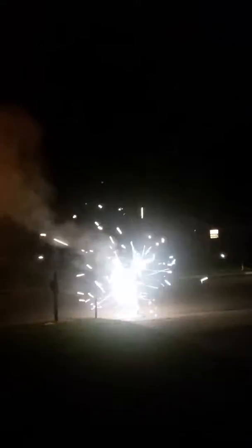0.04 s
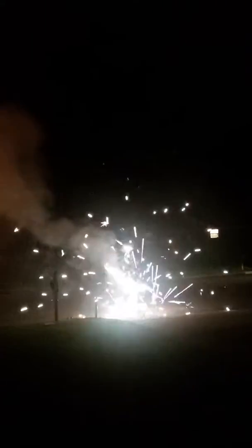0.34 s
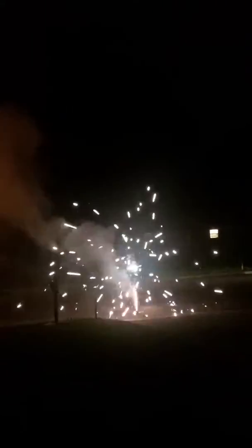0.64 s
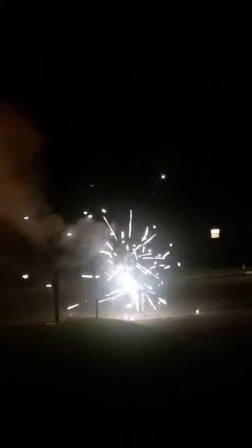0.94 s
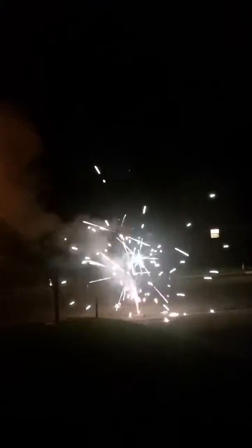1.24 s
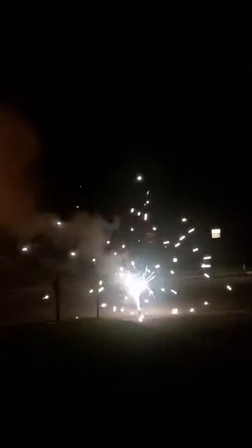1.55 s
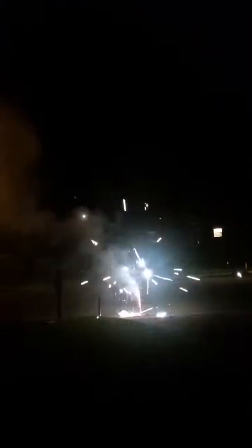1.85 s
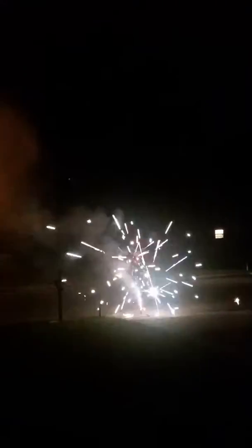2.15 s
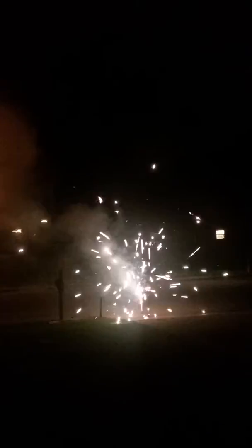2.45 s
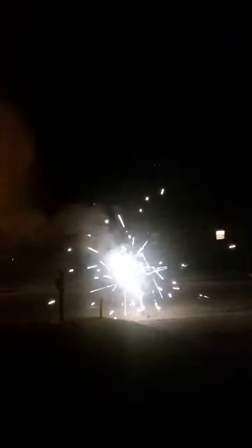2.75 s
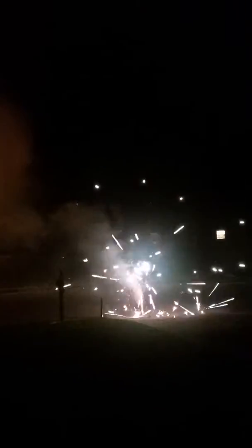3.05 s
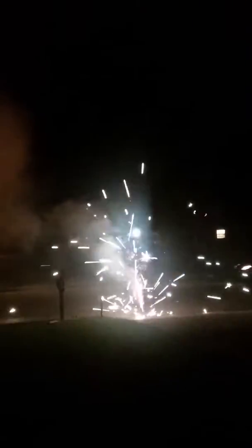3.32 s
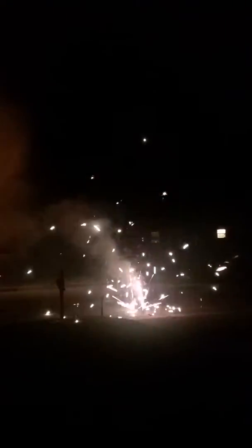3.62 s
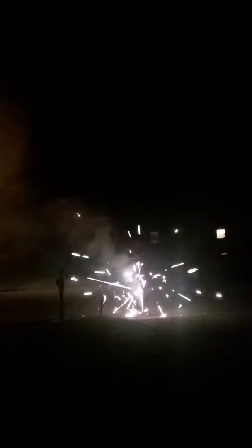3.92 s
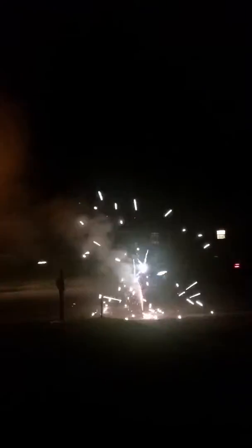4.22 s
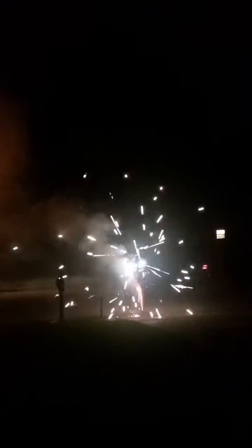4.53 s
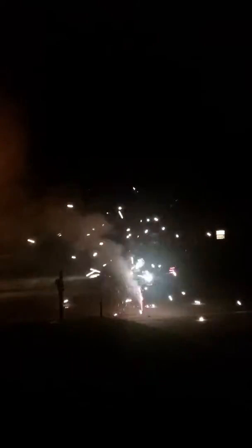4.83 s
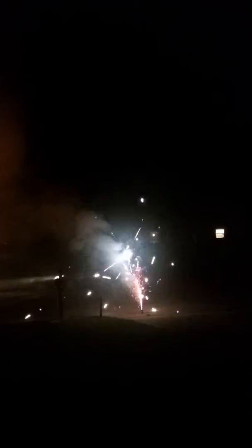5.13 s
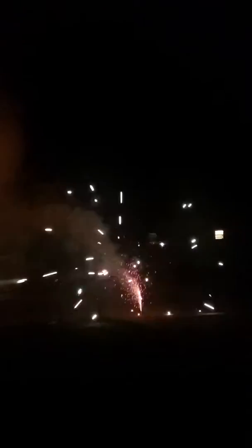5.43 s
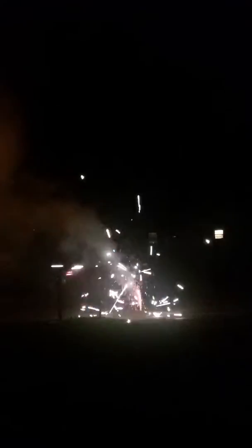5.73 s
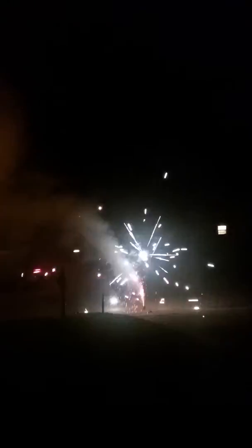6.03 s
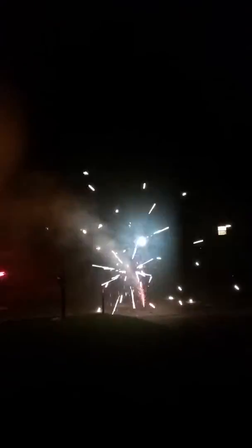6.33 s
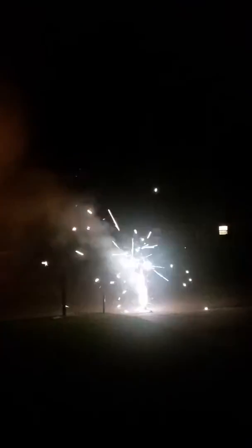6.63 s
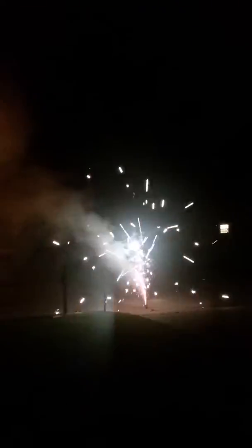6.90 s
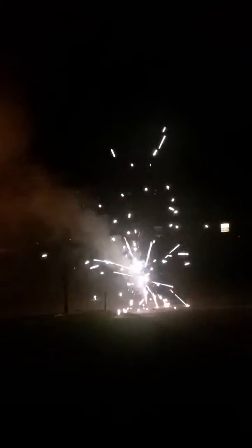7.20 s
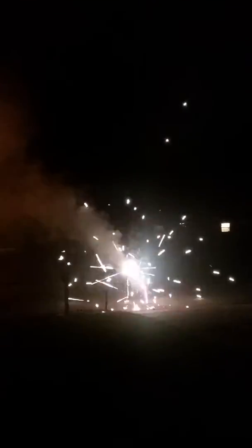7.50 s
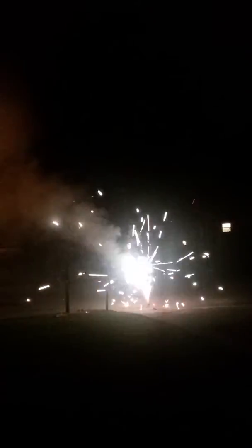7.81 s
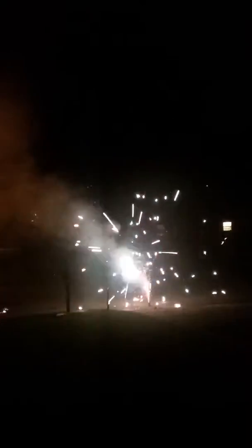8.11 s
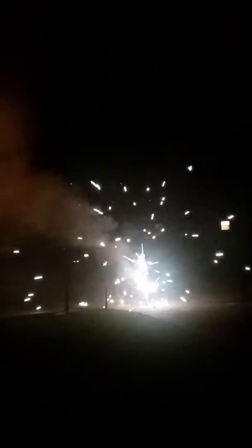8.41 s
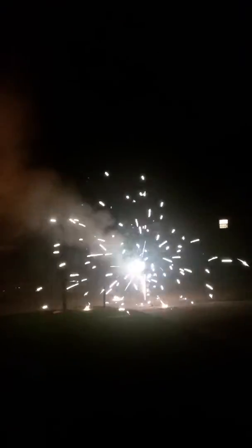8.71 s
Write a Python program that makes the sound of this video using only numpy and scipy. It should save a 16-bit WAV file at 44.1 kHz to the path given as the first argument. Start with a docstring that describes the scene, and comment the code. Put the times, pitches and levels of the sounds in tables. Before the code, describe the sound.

A fountain firework is already crackling at the start, several metres away in an open yard, and keeps going for about nine seconds. Sharp, bright pops come at roughly twenty or more a second, irregular in timing and strength, some doubling up or bunching into quick volleys. Each has a short echo with a slightly hollow ring from nearby walls. Beneath them are tiny spark snaps and a faint steady hiss with a low rumble. The crackle has very brief gaps around 1.8, 3.8 and 5.2 seconds. Faint low thuds come from farther off at about 2.1, 4.3 and 5.8 seconds. Stronger cracks stand out near 1.3, 3.2 and 4.8 seconds. From about 6.8 seconds the popping grows a little denser and louder, with a hard crack near 8.7 seconds.

```python
"""On a lawn at night, a fountain firework crackles some metres away.
Each bursting star sends out a tiny blast wave, heard as a crack. The ground and nearby surfaces reflect
it, walls add a low hollow ring, and the yard scatters it into a short dull tail. Underneath, the jet
hisses faintly, small sparks snap, and a few low thuds come from farther off."""
import sys
import numpy as np
from scipy import signal
from scipy.fft import rfft, irfft, next_fast_len
from scipy.io import wavfile
from scipy.ndimage import uniform_filter1d, minimum_filter1d

SR = 44100
rng = np.random.default_rng(int(sys.argv[2]) if len(sys.argv) > 2 else 0)


def log_audio(samples):
    """Write samples as a 16-bit WAV file to the path given in sys.argv[1]."""
    # one column per channel
    frames = np.atleast_2d(samples).T
    # limit to full scale, then quantise
    limited = np.clip(frames, -1, 1)
    pcm = np.round(limited * 32767).astype(np.int16)
    wavfile.write(sys.argv[1], SR, pcm)


N = 386296
FFT_SIZE = next_fast_len(N + SR, True)   # room for the tails
BIN_HZ = np.maximum(np.arange(FFT_SIZE // 2 + 1) * SR / FFT_SIZE, 1)

# Spectrum of the burning jet and the night air. Each row: frequency in Hz, relative level in dB.
JET_SPECTRUM = [(25, -16), (70, -3), (130, -5.5), (400, -6.5), (1500, 5.5), (3500, -6.5), (7000, -26),
                (15000, -37)]
# Distant thuds. Each row: start in seconds, level in dB.
FAR_THUDS = [(2.07, -41.5), (4.26, -45.5), (5.79, -44.5)]
# Spectrum of the yard's scatter. Each row: frequency in Hz, relative level in dB.
YARD_SPECTRUM = [(60, -6), (150, -13.5), (280, -5), (420, -8.5), (700, -1.5), (1200, 0), (4000, 2.5),
                 (8000, 0.66), (15000, 5.5)]
# Reverberation of the yard. Each row: frequency in Hz, time to fall 60 dB in seconds.
YARD_DECAY = [(100, 1), (500, 0.32), (2000, 0.64), (6000, 0.84), (15000, 0.69)]
# Modes between the walls. Each row: frequency in Hz, level in dB, time to fall 60 dB in seconds.
WALL_RESONANCES = [(120.7, -57, 0.66), (200, -50.5, 0.16), (287, -45.5, 0.12), (406.7, -47.5, 0.17),
                   (502.2, -47, 0.27), (601.5, -51.5, 0.31), (695, -49, 0.24), (801, -54.5, 0.33),
                   (942, -62, 0.087), (1105, -49, 0.13), (1337, -57.5, 0.24)]
# Reflections from nearby surfaces. Each row: delay in ms, left gain in dB, right gain in dB.
NEAR_REFLECTIONS = [(1.52, -16, -43), (1.96, -29, -19.5), (3.6, -7.5, -44), (3.9, -14.5, -8),
                    (4.7, -15.5, -11.5), (11.4, -24, -12), (12.6, -30, -11.5)]
# Ground effect: soft ground cancels the bass. Each row: frequency in Hz, gain in dB.
GROUND_EFFECT = [(80, -10), (300, -34), (550, 0.5), (900, 4), (5000, 4), (9000, 6.5), (15000, 9)]
# Response of two microphones to a crack. Each row: frequency in Hz, left gain in dB, right gain in dB.
MIC_RESPONSE = [(58, -19, -25), (233, -1, 0.5), (538, 3, -1), (880, 7.5, 9.5), (1076, 13.5, 12.5),
                (1650, 13.5, 18.5), (2540, 14, 14.5), (3580, 14.5, 5), (5140, 9.5, -6.5), (5540, 4, 1.5),
                (7320, 2.5, -1), (11680, -9.5, -16.5), (15500, -16.5, -17)]
# Bursts of the loud stars. Each row: start in seconds, relative level in dB.
LOUD_STARS = [(-0.025, -1), (0.04, -3), (0.053, -3.5), (0.0688, 0.5), (0.0865, -5), (0.154, -2), (0.16, 0),
              (0.167, -1), (0.2067, -3.0), (0.2149, -1), (0.2223, -6), (0.2468, -5.5), (0.2718, -1.5),
              (0.3159, -6.0), (0.3471, -9), (0.388, 3.5), (0.4385, 1), (0.4456, -5.5), (0.479, -2.0),
              (0.506, -4), (0.525, -4), (0.535, -4), (0.5579, -2), (0.6148, -3), (0.644, -0.5),
              (0.6828, -2.5), (0.693, -3), (0.784, -8.5), (0.8131, -0.5), (0.8374, -0.5), (0.905, -1.0),
              (0.9486, -1), (0.979, -4.5), (1.031, 2.0), (1.05, -2), (1.0807, 2), (1.1763, -4.5),
              (1.1997, -2), (1.2302, -2.5), (1.248, -3.0), (1.284, -4.5), (1.298, -5.5), (1.3307, 5.0),
              (1.3615, 3), (1.4623, -4), (1.5007, -5), (1.5272, -3.5), (1.5596, -1.5), (1.6814, -3),
              (1.7215, -1.5), (1.8886, -6.5), (1.8975, 2), (1.9782, 1), (2.044, -5), (2.0635, -1.5),
              (2.0991, -6.5), (2.1333, -0.5), (2.168, -1.5), (2.2036, -6), (2.2222, 3.0), (2.233, -9),
              (2.2518, -5), (2.279, -4.5), (2.331, 2.5), (2.3867, 1.5), (2.445, -4), (2.501, 0.5),
              (2.528, -1), (2.553, -3), (2.6029, -7), (2.7065, 0), (2.7422, -4.0), (2.8132, -2.5),
              (2.8241, -0.5), (2.8621, 0.5), (2.8716, 0.5), (2.878, -2), (2.9715, 1), (3.019, -1.5),
              (3.0877, -2.5), (3.1032, -2.5), (3.1384, -7.5), (3.1562, 5.5), (3.191, 0), (3.228, 2.5),
              (3.279, -7.5), (3.2947, 2.5), (3.3278, 5.5), (3.3901, 4), (3.404, -3.0), (3.4316, -0.5),
              (3.473, 3), (3.5343, -3.5), (3.5431, 0), (3.5756, -4.0), (3.6273, -6), (3.6757, -2.5),
              (3.6963, -3.5), (3.734, 2), (3.946, -4), (3.972, 1.5), (4.0377, 3.5), (4.1113, -1.5),
              (4.151, 3), (4.1834, -5.5), (4.2296, -6), (4.2478, 4), (4.3051, -3), (4.3579, -4),
              (4.3937, -3), (4.399, 2), (4.4306, -6), (4.4504, -5), (4.5006, -6.5), (4.519, -3.5),
              (4.5397, -7), (4.5593, -9), (4.5924, -1.5), (4.6115, -3), (4.654, -0.5), (4.738, -3.5),
              (4.7518, -1), (4.781, -1.5), (4.8005, -6.5), (4.8262, 6), (4.9478, -5.5), (5.018, 1.0),
              (5.071, 1.0), (5.1052, 3), (5.255, -2.0), (5.304, -3.5), (5.3335, -3.5), (5.357, 2.0),
              (5.4105, -3), (5.4439, -2.5), (5.493, 1), (5.5935, 2.5), (5.6744, -7.5), (5.6891, -4.5),
              (5.774, -0.5), (5.8011, 3.5), (5.8416, -1), (5.9838, -8), (6.0374, -3.5), (6.0751, 2),
              (6.1464, -4), (6.1571, -6.5), (6.194, -2), (6.2539, 4), (6.342, 0.5), (6.357, -3.5),
              (6.3912, -0.5), (6.408, -1.5), (6.4373, -6), (6.481, 0), (6.5549, -5.5), (6.6228, 0),
              (6.6914, 0), (6.7479, 0.5), (6.7762, -2), (6.8254, -6), (6.8336, 0.5), (6.8522, -3.5),
              (6.873, 5), (6.9627, 0.5), (7.0108, -2.5), (7.0478, -1), (7.091, -1), (7.1048, 4.5),
              (7.1244, -4.5), (7.1757, 3.5), (7.1865, 0), (7.2473, 0.5), (7.2656, -7.5), (7.2915, -5),
              (7.312, 0), (7.3543, -7), (7.3917, 0.5), (7.403, -4.5), (7.4451, 0), (7.47, 2),
              (7.5248, -4.5), (7.5558, 1.5), (7.5922, 4.5), (7.624, 2.5), (7.6695, -3), (7.722, -3),
              (7.79, -0.5), (7.7965, -2.0), (7.8397, 2.5), (7.8871, -2), (7.9227, -6), (7.946, -3.5),
              (7.9575, -6), (7.9725, -4), (7.9903, -1.5), (8.0142, -2.0), (8.0315, 2.5), (8.0927, -1.5),
              (8.102, -3.0), (8.1145, 4), (8.19, -4), (8.2322, -3.5), (8.2634, 0.5), (8.292, 0),
              (8.3023, -0.5), (8.3186, -1.0), (8.3295, 2.0), (8.36, -6), (8.3803, 0), (8.385, 6.5),
              (8.4385, 2.5), (8.5435, -5.5), (8.5503, -2.5), (8.5771, -0.5), (8.5862, -0.5), (8.6273, 0),
              (8.6464, 0.5), (8.708, 8.5), (8.7538, -5)]


def from_db(db):
    """Amplitude ratio of a level in decibels."""
    return 10 ** (np.asarray(db) / 20)


def at_hz(table, hz, column=1):
    """Interpolation of a table column on a logarithmic frequency axis."""
    table = np.array(table)
    return np.interp(np.log(hz), np.log(table[:, 0]), table[:, column])


def unit_rms(x):
    """Normalisation to unit mean power."""
    return x / np.sqrt(np.mean(x ** 2) + 1e-20)


def diffuse_pair(mid, side, hz, corner_hz):
    """Coherence in a diffuse field: long waves reach left and right alike, short ones independently."""
    coherence = 1 / (1 + (hz / corner_hz) ** 2)
    return np.sqrt(1 + coherence) * mid + np.sqrt(1 - coherence) * side * [[1], [-1]]


def blast_waves(times, gains, widths_ms):
    """Spectrum of blast waves: pressure jumps, then decays exponentially; wider pulses are duller."""
    starts = np.round(times * SR).astype(int)
    age = np.arange(int(SR / 1000))
    pulses = np.exp(-age / (widths_ms[:, None] * SR / 1000))
    pulses /= pulses.sum(axis=1, keepdims=True)
    train = np.zeros(FFT_SIZE)
    np.add.at(train, (starts[:, None] + age) % FFT_SIZE, gains[:, None] * pulses)
    return rfft(train)


def jet(level_db=-46.5):
    """Steady broadband noise: the soft rush of the burning tube over the low rumble of the night."""
    mid, side = rfft(rng.standard_normal((2, FFT_SIZE)))
    spectrum = diffuse_pair(mid, side, BIN_HZ, corner_hz=600) * from_db(at_hz(JET_SPECTRUM, BIN_HZ))
    return from_db(level_db) * unit_rms(irfft(spectrum, FFT_SIZE)[:, :N])


def thuds(hz=122, t60=0.26, deep_hz=70, deep_db=-7, build_s=0.0091):
    """Damped oscillation: each distant thud is two low tones that swell and decay exponentially."""
    out = np.zeros(N)
    for start, db in FAR_THUDS:
        age = np.maximum(np.arange(N) / SR - start, 0)
        tones = np.sin(2 * np.pi * hz * age) + from_db(deep_db) * np.sin(2 * np.pi * deep_hz * age)
        out += tones * (1 - np.exp(-age / build_s)) * from_db(db - 60 * np.minimum(age / t60, 2))
    return out


def sparks(per_s=55, level_db=-24, width_ms=.012):
    """Spectrum of a Poisson process: small sparks snap faintly at independent, random moments."""
    times = np.flatnonzero(rng.random(N) < per_s / SR) / SR
    gains = from_db(level_db) * rng.random(len(times))
    return blast_waves(times, gains, np.full(len(times), width_ms))


def yard_scatter(gain_db=-36, build_s=0.001, early_s=0.025, facade_s=.133, facade_width_s=0.0054):
    """Reverberation as a frequency response: early scatter, a tail dying by band, a far facade's echo."""
    age = np.arange(int(.7 * SR)) / SR
    envelope = (1 - np.exp(-(age / build_s) ** 2)) * (1 + np.exp(-age / early_s))
    envelope *= 1 + from_db(-3) * np.exp(-((age - facade_s) / facade_width_s) ** 2)
    # separate objects return the sound in clumps of a few milliseconds
    clumps = unit_rms(uniform_filter1d(rng.standard_normal(len(age)), size=110))
    envelope *= unit_rms(from_db(2.2 * np.clip(clumps, -2, 2)))
    white = rng.standard_normal((2, 2, len(age)))
    edges_hz = np.geomspace(40, 18000, 15)
    tail = 0
    for k, (low, high) in enumerate(zip(edges_hz, edges_hz[1:])):
        hz = np.sqrt(low * high)
        band = signal.butter(2, [low, high], "band", fs=SR, output="sos")
        mid, side = signal.sosfilt(band, white[k % 2])
        decay = from_db(-60 * age / at_hz(YARD_DECAY, hz))
        tail += diffuse_pair(mid, side, hz, corner_hz=560) * envelope * decay
    return rfft(tail, FFT_SIZE) * from_db(at_hz(YARD_SPECTRUM, BIN_HZ) + gain_db)


def wall_ring(delay_s=.0105, build_s=0.0009, knock_s=0.01554, knock_width_s=0.0044, knock_hz=243):
    """Modal resonance as a frequency response: the walls answer with a hollow ring and a low knock."""
    t = np.arange(SR // 2) / SR
    age = np.maximum(t - delay_s, 0)
    ring = sum(from_db(db - 60 * age / t60) * np.sin(2 * np.pi * hz * age)
               for hz, db, t60 in WALL_RESONANCES)
    ring *= 1 - np.exp(-age / build_s)
    knock = np.exp(-((t - knock_s) / knock_width_s) ** 2) * np.cos(2 * np.pi * knock_hz * (t - knock_s))
    return rfft(ring + from_db(-41) * knock, FFT_SIZE)


def near_paths(times, gains, widths_ms, wander=.045, widening=1.55, left_lag_ms=0.044, shadow_hz=6500):
    """Interference spectrum of each crack and its first reflections, which shift with the star's place."""
    draws = rng.standard_normal((len(times), len(NEAR_REFLECTIONS), 2))
    direct = blast_waves(times, gains, widths_ms)
    out = np.array([direct, direct])
    for k, (delay_ms, left_db, right_db) in enumerate(NEAR_REFLECTIONS):
        shift, scatter_db = draws[:, k].T
        delay_s = delay_ms / 1000 * (1 + wander * shift / np.sqrt(delay_ms))
        echo = blast_waves(times + delay_s, gains * from_db(scatter_db), widths_ms * widening)
        out += from_db([[left_db], [right_db]]) * echo
    out[0] *= np.exp(-2j * np.pi * BIN_HZ * left_lag_ms / 1000)
    out[1] /= np.sqrt(1 + (BIN_HZ / shadow_hz) ** 4)   # the right microphone faces away
    return out * from_db(at_hz(GROUND_EFFECT, BIN_HZ))


def star_bursts(chain_chance=.5, chain_delay_s=.016, volley_s=.06,
                split_above_db=0.26, split_chance=.45, split_delay_s=.003, split_share=0.37):
    """Chain reaction and fragmentation: times in seconds and relative levels in dB of all bursts."""
    times, level_db = np.transpose(LOUD_STARS)
    chain_draw, split_draw = rng.random((len(times), 2)).T
    wait, size, gap = np.clip(rng.standard_normal((len(times), 3)), -2, 2).T
    # a loud star may set off a lesser one, the more likely the denser the volley
    chain_times = times + chain_delay_s * np.exp(.6 * wait)
    chain_db = -7.5 + 2.5 * size
    density = np.exp(-((chain_times[:, None] - times) / volley_s) ** 2).sum(axis=1)
    chained = chain_draw < chain_chance * density / density.mean()
    # some big stars break in two, and the second crack takes a share of the energy
    split = (level_db > split_above_db) & (split_draw < split_chance)
    split_times = times + split_delay_s * (1 + .5 * np.tanh(gap))
    first_db = level_db + 10 * np.log10(1 - split_share * split)
    second_db = level_db + 10 * np.log10(split_share)
    return (np.r_[times, split_times[split], chain_times[chained]],
            np.r_[first_db, second_db[split], chain_db[chained]])


def crackle(gain_db=-1, width_ms=0.029, bounce_ms=.55, bounce_db=-11, regions=5):
    """Superposition spectrum of the stars' blasts and echoes; each spray region has its own yard tail."""
    times, level_db = star_bursts()
    size, height = rng.standard_normal((len(times), 2)).T
    region = np.tile(rng.integers(0, regions, len(times)), 2)
    gains = from_db(level_db + gain_db)
    widths_ms = np.tile(width_ms * gains ** 0.44 * np.exp(0.44 * size), 2)   # big stars sound fuller
    # comb filtering: the ground bounce colours each crack according to the star's height
    times = np.r_[times, times + bounce_ms / 1000 * np.exp(.5 * height)]
    gains = np.r_[gains, gains * from_db(bounce_db)]
    out = near_paths(times, gains, widths_ms)
    walls = wall_ring()
    for k in range(regions):
        out += blast_waves(times, gains * (region == k), widths_ms) * (yard_scatter() + walls)
    return out


def scene(phase_rad=1.13):
    """Linear superposition: cracks and sparks, filtered by the microphones, over the jet and thuds."""
    response = from_db([at_hz(MIC_RESPONSE, BIN_HZ, column) for column in (1, 2)])
    response = response * np.exp(-1j * phase_rad)   # the phase shift makes each crack swing down, then up
    cracks = irfft((crackle() + sparks()) * response, FFT_SIZE)[:, :N]
    return cracks + jet() + thuds()


def limiter(x, threshold_db=-1.0, slope=0.86):
    """Peak limiting: the gain dips just ahead of each strong crack and recovers within milliseconds."""
    over_db = np.maximum(20 * np.log10(np.abs(x).max(axis=0) + 1e-9) - threshold_db, 0)
    release_ramp = 450 * np.arange(N) / SR
    held_db = np.maximum.accumulate(over_db + release_ramp) - release_ramp
    gain_db = minimum_filter1d(-slope * held_db, size=45)
    return x * from_db(uniform_filter1d(gain_db, size=45))


def record(dry, clip_level=0.81, clean_below_hz=700, low_cut_hz=48, high_cut_hz=16000):
    """Clipping distortion: limited peaks snap brightly while the bass stays clean; rumble and top are cut."""
    limited = limiter(dry)
    distortion = np.clip(limited, -clip_level, clip_level) - limited
    bass_cut = signal.butter(2, clean_below_hz, "high", fs=SR, output="sos")
    clipped = limited + signal.sosfiltfilt(bass_cut, distortion)
    clipped = signal.sosfilt(signal.butter(2, low_cut_hz, "high", fs=SR, output="sos"), clipped)
    return signal.fftconvolve(clipped, signal.firwin(255, high_cut_hz, fs=SR)[None], "same", axes=1)


dry = scene()
out = record(dry)
log_audio(out)
```